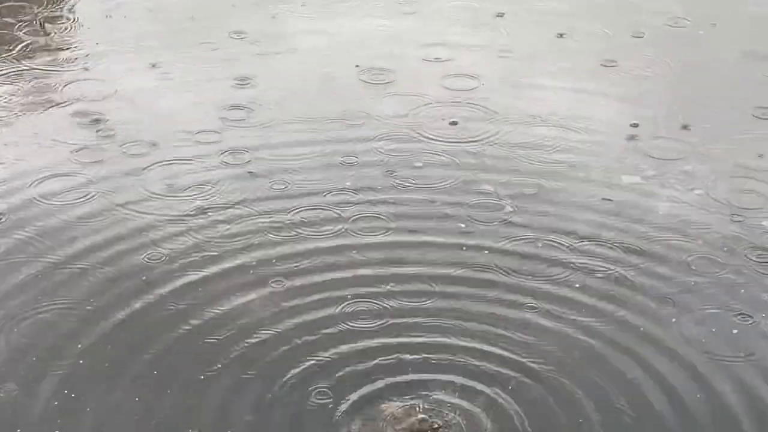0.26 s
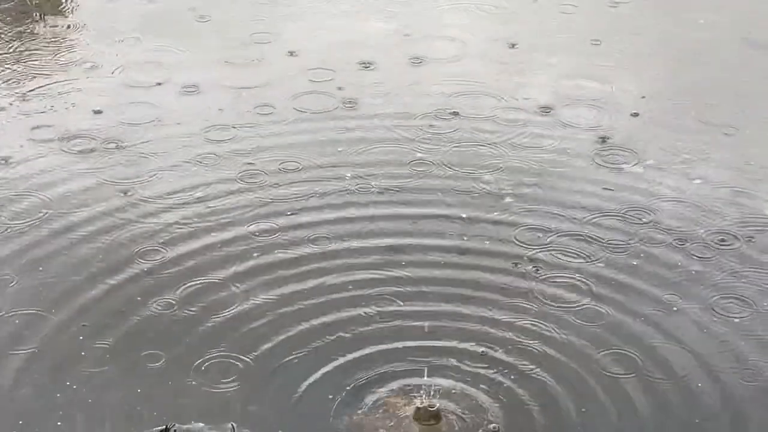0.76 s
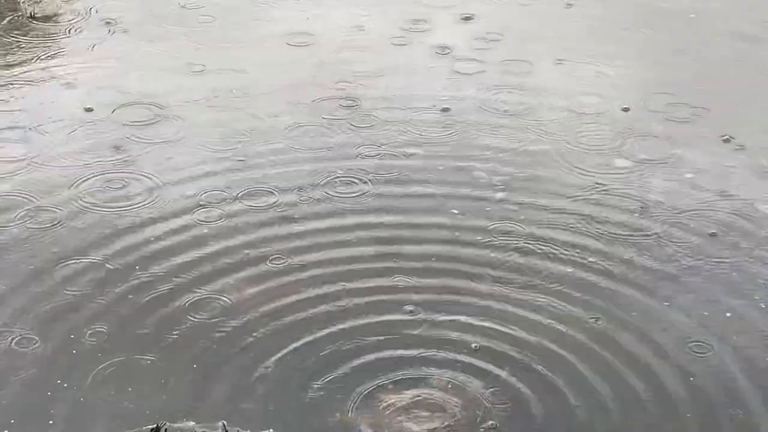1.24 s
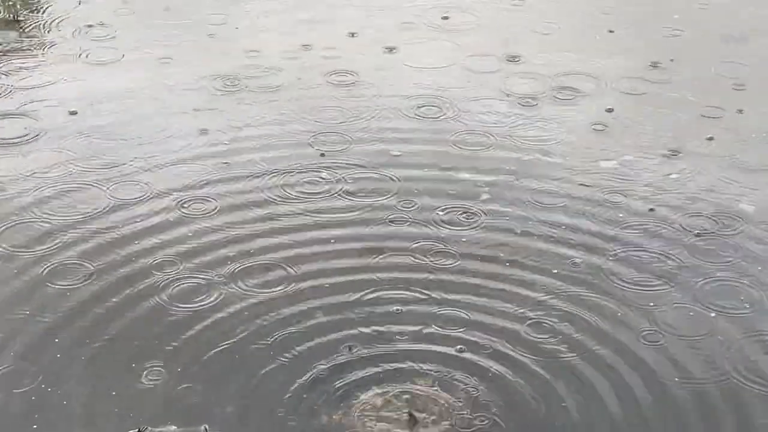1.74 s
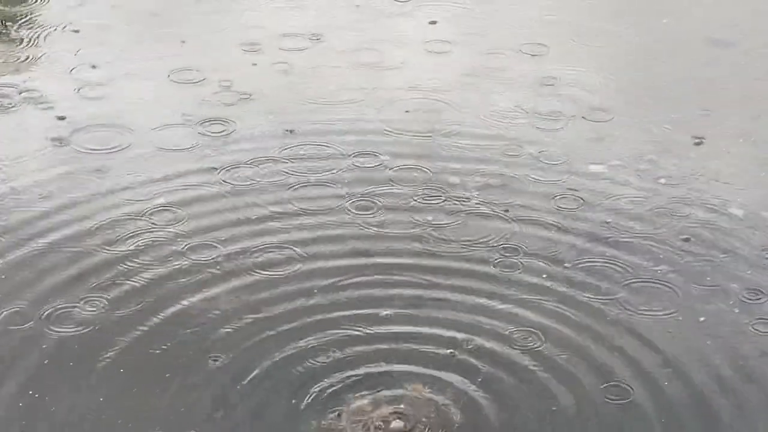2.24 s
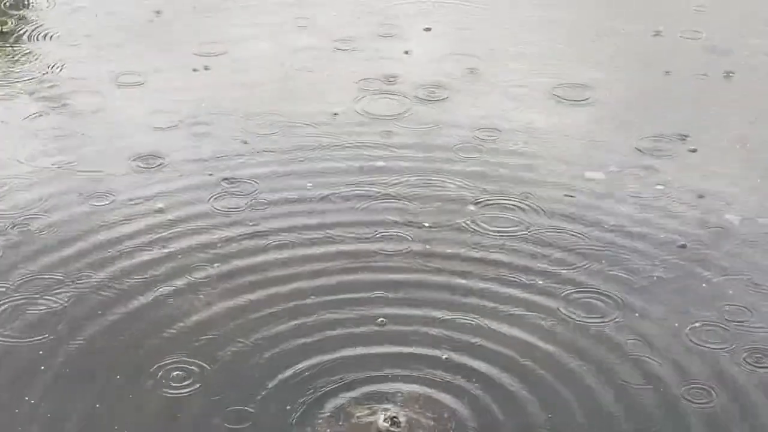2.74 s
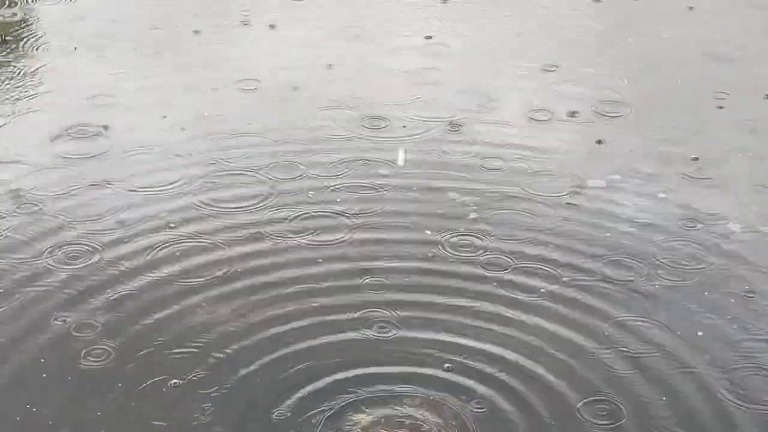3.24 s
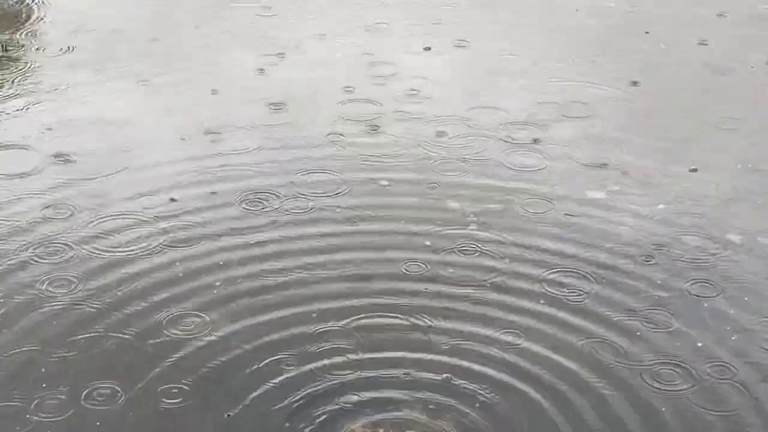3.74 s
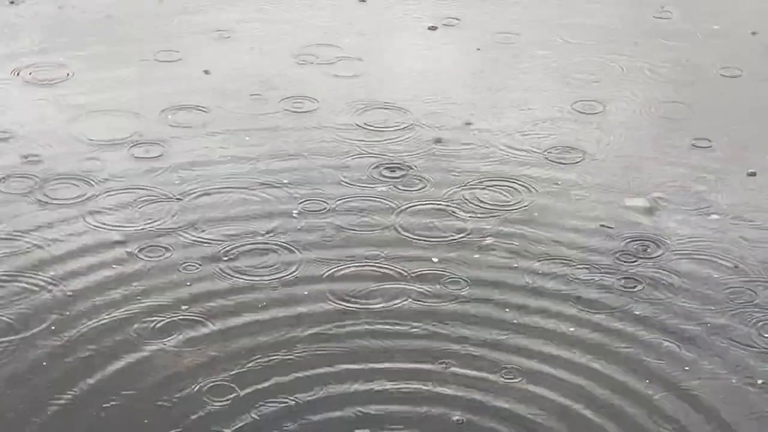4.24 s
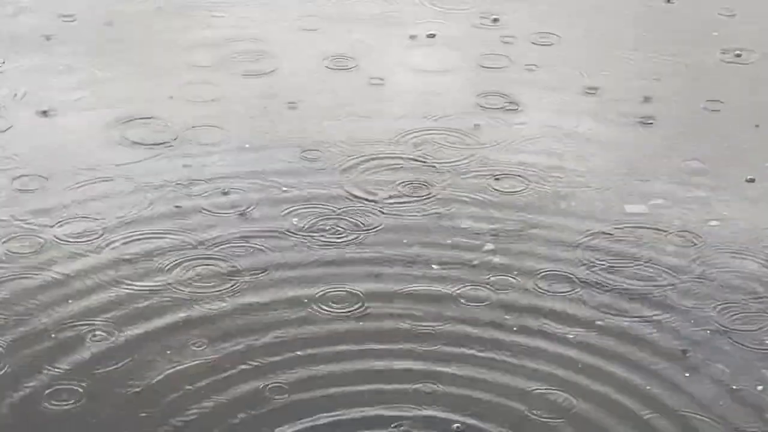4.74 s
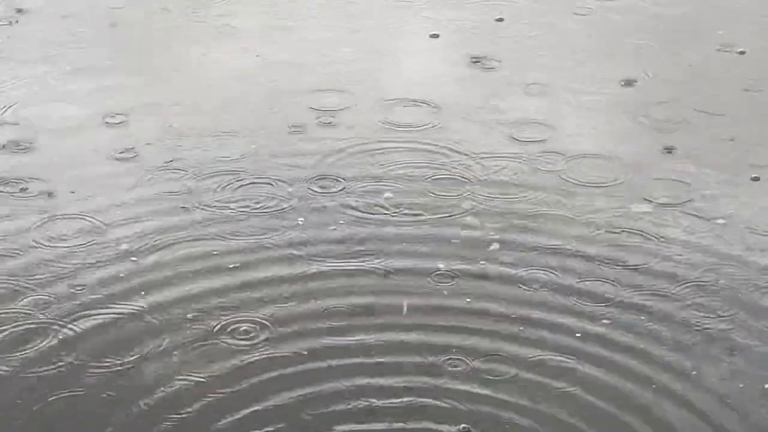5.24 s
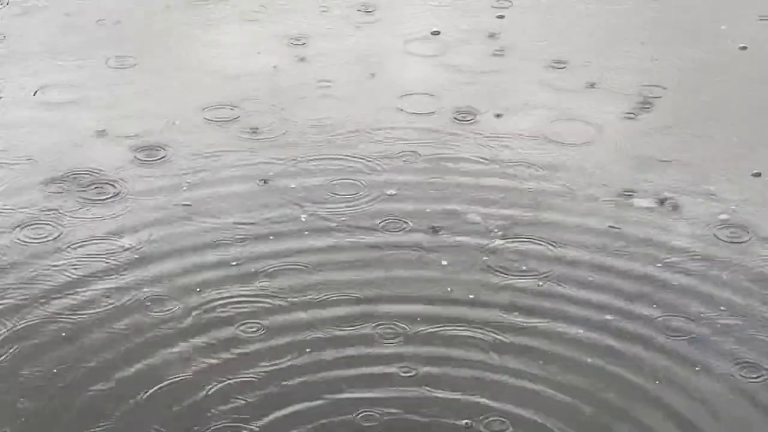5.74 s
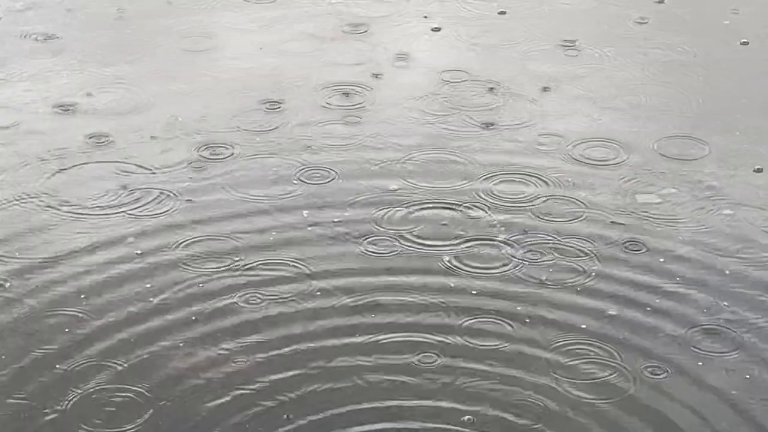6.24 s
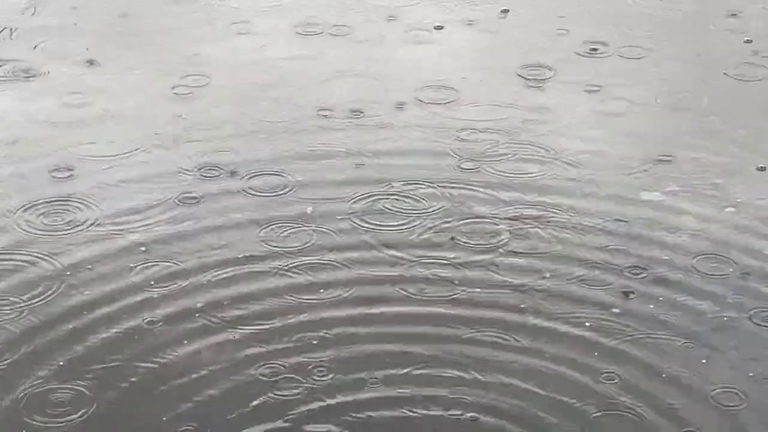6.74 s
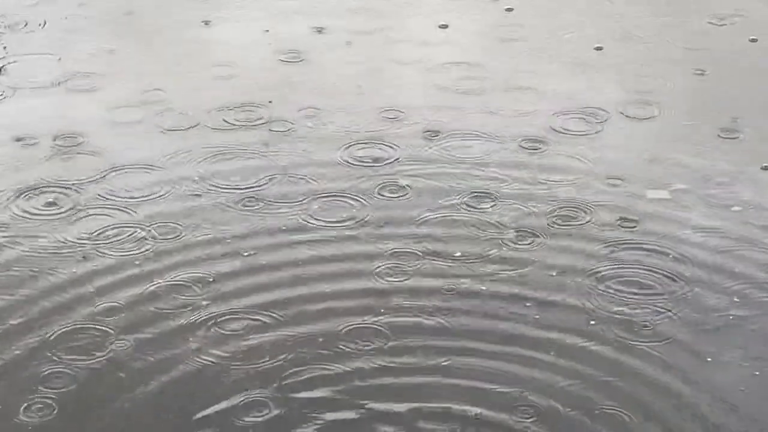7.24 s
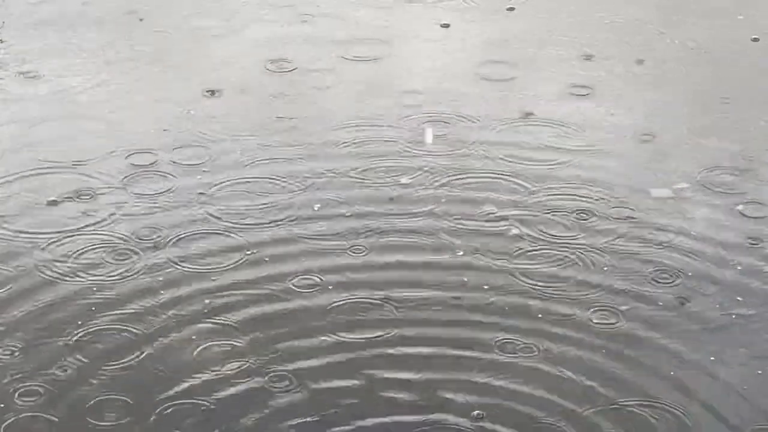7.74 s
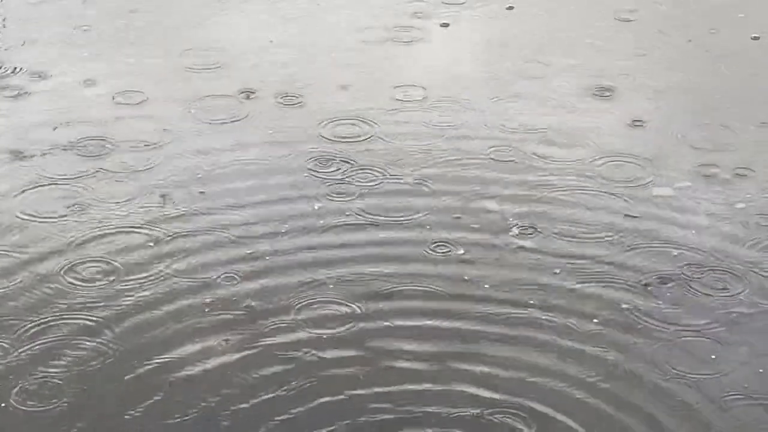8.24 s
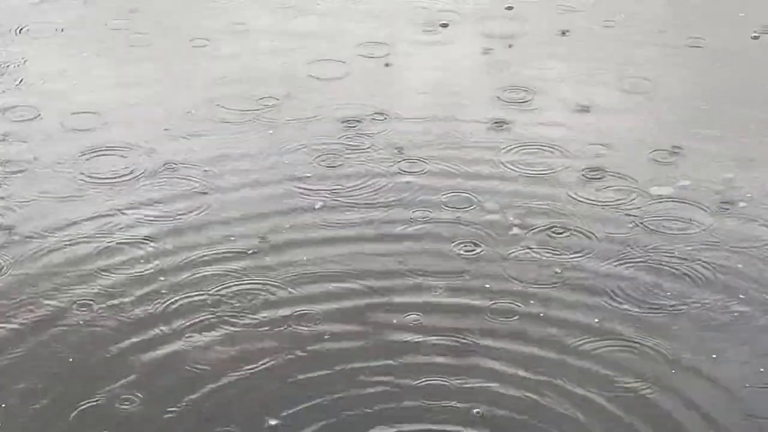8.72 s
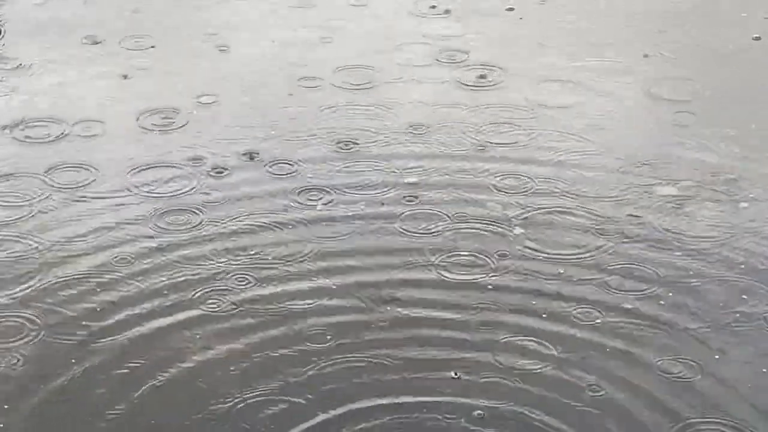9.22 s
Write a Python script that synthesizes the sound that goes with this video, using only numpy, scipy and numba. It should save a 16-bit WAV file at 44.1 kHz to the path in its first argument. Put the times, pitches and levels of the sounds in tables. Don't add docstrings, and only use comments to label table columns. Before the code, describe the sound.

Close-up water drops slap and ring brightly on a puddle, with fine spatter, occasional rounder bubble gulps, gentle rain hiss and distant traffic.

```python
import sys
import numpy as np
from scipy import signal
from scipy.fft import rfft, irfft
from scipy.io import wavfile
from scipy.ndimage import uniform_filter1d
from numba import njit

SR = 44100
rng = np.random.default_rng(int(sys.argv[2]) if len(sys.argv) > 2 else 0)


def natural_amplitude(level_db):
    exponent = np.asarray(level_db, float) / 20
    return 10 ** exponent


def store_wav(level_fs):
    pcm = np.round(np.clip(np.atleast_2d(level_fs), -1, 1) * 32767)
    wavfile.write(sys.argv[1], SR, pcm.T.astype(np.int16))


N = 418068

# t/s, level/dB
TRAFFIC_RUMBLE = [(0.0, -57), (0.02, -49.5), (1.95, -53.5), (2.43, -46), (2.59, -51), (3.85, -52),
                  (4.3, -44.5), (5.04, -55.5), (5.07, -49), (7.82, -49), (8.58, -46.5), (8.84, -58),
                  (9.0, -45.5), (9.48, -53)]
# t/s, f/Hz, level/dB
ENGINE_LINE = [
    (1.9, 90, -55),
    (2.2, 90.2, -54),
    (2.9, 99, -52),
    (3.55, 103, -56),
    (3.9, 89, -51.5),
    (4.4, 78.8, -55),
]
# f/Hz, density/dB per Hz
TOWN_SPECTRUM = [(22, -45), (38, -12.5), (62, 1), (100, -12), (118, -12.5), (138, -9), (200, -16),
                 (400, -22.5), (700, -25.5), (1300, -27), (2000, -26.5), (2800, -40), (4000, -46)]
# f/Hz, likeness of the ports/0-1
TOWN_LIKENESS = [(60, 0.97), (150, 0.88), (300, 0.77), (640, 0), (1400, 0.07), (2400, 0.83)]
# t/s, level/dB
FAR_RAIN_LEVEL = [(0.0, -52), (1.16, -59), (1.77, -59), (3.48, -60), (4.14, -56), (4.28, -57),
                  (5.91, -59.5), (6.07, -55.5), (7.71, -59.5), (8.9, -57.5), (9.48, -60.5)]
# f/Hz, density/dB per Hz
HISS_SPECTRUM = [(1200, -72), (1900, 11), (2600, 14), (4200, 6), (5800, 1), (8500, 15), (10500, 0.5),
                 (12500, 2), (16000, -38)]
# delay/s, level/dB
WALL_ECHOES = [(.0052, -20), (.0103, -19), (.0152, -14), (.0195, -8), (.030, -19), (.043, -16)]
# f/Hz, level/dB
PORT_BALANCE = [(60, 1.5), (110, 4.5), (200, 2.5), (380, 2), (700, 1.5), (1290, 4.5), (2380, 2), (4400, 2),
                (8120, 0.0), (15000, -0.5)]
# f/Hz, phase/rad
PORT_LEAD = [(0, 0), (2500, .15), (5600, 0), (6800, -1.1), (8200, -3.14), (10100, -5.2), (11400, -6.3),
             (12700, -7.1), (14000, -9.1), (15200, -9.85), (16500, -10.4), (22050, -12)]
# f/Hz, level/dB
FIZZ_SPECTRUM = [(6000, -24.5), (9000, 5), (12500, -3), (15500, 2)]
# f/Hz, level/dB
CRACK_SPECTRUM = [(2000, -20), (4500, -6.5), (6500, 1), (9500, -8.5)]
# t/s, peak level/dB, f/Hz
STEADY_BUBBLES = [(0.378, -43, 2720), (0.405, -44, 2260), (2.119, -49, 1850), (2.21, -42, 2030),
                  (2.264, -46, 1450), (5.54, -43, 2030), (7.944, -50, 1370), (8.861, -43, 2050),
                  (9.207, -40.5, 876)]
# t/s, peak level/dB, f/Hz, pitch rise/octaves
BIG_BUBBLES = [(0.816, -27, 1277, 0.79), (2.147, -48, 1520, .35), (2.215, -55.5, 907, .2),
               (5.322, -55, 920, 0.33), (5.547, -55, 940, 0.3), (5.753, -48, 1250, 0.57),
               (5.96, -37.5, 823, 1.1), (6.648, -51.5, 1120, 0.73), (7.098, -46.5, 1028, 0.31),
               (7.261, -37.5, 836, 0.76), (7.908, -48.5, 845, 0.25), (8.556, -53, 990, 0.44),
               (8.866, -55, 945, .2)]
# t/s, peak fizz level/dB
FINE_SLAPS = [(2.3675, -43), (4.33, -41), (6.259, -43), (6.54, -45), (6.631, -39), (8.511, -41),
              (8.652, -43), (9.1484, -39.5), (9.238, -37)]
# t/s, peak fizz level/dB, crack re fizz/dB
STONE_SLAPS = [(0.094, -34.5, -12), (0.1133, -35, -12), (0.2615, -26.5, -22), (1.296, -48, -15),
               (1.4012, -31.5, -15.5), (1.467, -35.5, -10), (1.9202, -31, -22), (2.044, -27, -32),
               (2.0447, -21, -25), (2.2967, -40, -12), (2.6889, -34, -12.5), (2.877, -35, -20),
               (3.2871, -32, -16), (3.766, -38, -8), (3.9852, -24, -9.5), (4.221, -38, -9),
               (4.6266, -34, -10.5), (4.783, -29, -28), (5.2641, -24.5, -21), (5.283, -33, -21),
               (5.912, -30.5, -13), (6.4527, -43, -14), (6.768, -30, -17), (7.012, -40, -10.5),
               (7.0447, -35.5, -21), (7.7998, -31, -22), (7.8543, -33.5, -10.5), (8.333, -41.5, -7),
               (8.701, -30, -19), (9.2804, -33.5, -20)]
# t/s, peak crack level/dB
WATER_SLAPS = [(0.5379, -42), (0.7473, -33), (1.0303, -44), (1.3857, -54), (2.245, -46), (2.4515, -48.5),
               (2.5023, -49), (2.826, -47), (3.014, -45), (3.5009, -48), (3.6916, -41.5), (4.0282, -44.5),
               (4.139, -45), (4.182, -35), (4.517, -48), (4.986, -51), (5.6307, -48), (5.9303, -59),
               (6.3028, -39), (6.563, -48), (7.0845, -48), (7.206, -37.5), (7.322, -41.5), (7.676, -48),
               (7.8092, -49), (8.2808, -44), (8.4775, -43), (8.7869, -46), (8.83, -42), (9.2289, -50)]
# t/s, peak level/dB, f/Hz
HEAVY_SPLASHES = [(0.5357, -33.5, 2490), (2.4508, -33, 2550), (2.723, -34, 2350), (3.014, -27, 2734),
                  (3.7898, -33.5, 2260), (6.3026, -28.5, 2080), (6.6375, -40, 2514), (7.7987, -33.5, 1950)]
# t/s, peak level/dB, bubble f/Hz, ring/cycles, spatter and echo level/dB
ROOF_DRIPS = [(0.0939, -31, 3140, 8, -7), (0.416, -27.5, 4670, 2.7, -9.5), (0.5397, -28, 3220, 3.3, -4.5),
              (0.7471, -26.5, 3680, 3.3, -2), (1.0743, -30.5, 6050, 5.5, 1), (2.044, -25, 6800, 1.6, -28),
              (2.452, -26, 3900, 1.7, -13), (2.7232, -25.5, 3450, 1.6, -14.5),
              (3.014, -24.5, 4900, 2.3, -6.5), (3.7912, -31.5, 4700, 3.7, 0),
              (3.9852, -26.5, 2940, 15, -7.5), (4.183, -23.5, 3370, 2.9, -0.5),
              (4.6263, -20.5, 6050, 1.5, -24), (5.2642, -30, 3670, 5.1, -8.5),
              (5.4795, -29, 4440, 3.7, -3.5), (6.11, -28, 5060, 4.7, -7), (6.3034, -24, 2330, 1.6, -8),
              (6.6365, -31, 3060, 3.3, -1), (7.206, -29, 3030, 13, -5.5), (7.7997, -29.5, 3760, 1.6, -4.5),
              (7.854, -34, 4040, 6, -3.5), (8.8323, -26.5, 6000, 2.6, -11), (8.8469, -26, 5500, 3, -12.5),
              (8.906, -29, 4640, 1, -7.5)]
# t/s, peak level/dB, bubble f/Hz
EVEN_DROPS = [(0.0564, -34, 4550), (0.3416, -32, 4170), (1.0316, -40, 3830), (1.0467, -37, 6160),
              (1.1693, -31.5, 4800), (1.2176, -30, 4600), (1.6077, -37.5, 6400), (1.7777, -38.5, 5400),
              (3.6381, -35, 6830), (4.0043, -37, 3100), (4.5296, -30, 3180), (4.8976, -39.5, 4640),
              (4.9868, -36, 4350), (5.3428, -40, 4200), (5.416, -38.5, 5300), (5.6304, -38.5, 4210),
              (5.7749, -43, 3420), (5.9404, -32.5, 5600), (6.0251, -30.5, 5500), (6.1451, -31.5, 4210),
              (6.7635, -31.5, 4690), (7.0858, -33.5, 6290), (7.2794, -35, 3630), (7.3228, -36, 3546),
              (7.3748, -36.5, 5740), (7.676, -35.5, 5970), (8.2805, -30, 4540), (8.477, -33.5, 3350),
              (8.7635, -37, 3260), (9.4709, -30.5, 7230)]
# t/s, peak level/dB, bubble f/Hz
SHATTERED_DROPS = [(0.4824, -37.5, 5470), (0.8584, -46, 3170), (0.9622, -35.5, 3840), (1.1548, -39, 4700),
                   (1.401, -38, 6200), (1.432, -40.5, 3800), (1.484, -39.5, 4170), (2.1261, -44, 3100),
                   (2.2375, -34, 4630), (2.6905, -53, 2180), (3.2873, -43.5, 5140), (3.3428, -43, 4170),
                   (3.3897, -34, 4130), (3.5014, -37.5, 4330), (4.1381, -36, 3080), (4.15, -36, 5200),
                   (4.4298, -45.5, 2900), (4.6931, -35, 3520), (5.9632, -39.5, 3520), (6.54, -43, 3330),
                   (6.5637, -39, 3750), (7.1911, -42, 4100), (8.1718, -41, 5440), (8.2022, -46, 5730),
                   (9.0074, -43, 4140), (9.23, -42, 5504)]
# t/s, peak level/dB, bubble f/Hz
CLEAN_DROPS = [(0.1118, -37, 3260), (0.2255, -32.5, 6600), (0.672, -36, 5070), (0.8395, -35.5, 2760),
               (0.874, -33.5, 5500), (1.4426, -32.5, 5220), (1.715, -38.5, 5160), (1.8422, -43.5, 3930),
               (2.391, -35.5, 5840), (2.5031, -35, 6250), (2.827, -45, 4890), (2.8764, -29, 4360),
               (2.9692, -36, 5830), (3.2126, -48, 5980), (3.6913, -32, 4200), (3.7656, -32.5, 4380),
               (3.926, -33.5, 5800), (4.7825, -31.5, 4900), (5.285, -34.5, 3700), (5.911, -35, 5880),
               (6.6019, -31.5, 4440), (7.2266, -33, 3380), (8.3898, -35, 5800), (8.5106, -37, 3470),
               (8.594, -37, 5405), (8.6524, -39, 4700), (8.6772, -38, 5660), (9.0753, -38, 4940),
               (9.2831, -39, 5690)]

# ring/cycles, spatter and echo level/dB
EVEN_KIND, SHATTERED_KIND, CLEAN_KIND = (3, -2.8), (2, 2.2), (2.93, -8)
YARD_T60_S, BRIGHT_T60_S = 0.41, 0.29
YARD_TAIL_DB, GULP_TAIL_DB = -8.5, -15.5
DROP_DELAY_S = .001
ECHO_SPREAD = .07
PATH_SCATTER = .035


def shape(x, points):
    hz, db = np.transpose(points)
    log_f = np.log(np.fft.rfftfreq(x.shape[-1], 1 / SR) + 1)
    gain = natural_amplitude(np.interp(log_f, np.log(hz), db))
    return irfft(rfft(x) * gain, x.shape[-1])


def curve(table):
    s, *columns = np.transpose(table)
    return [np.interp(np.arange(N) / SR, s, column) for column in columns]


def unit(x):
    return x / np.sqrt(np.mean(x ** 2))


def walk(rate_hz):
    hold = int(SR / rate_hz)
    steps = np.repeat(rng.standard_normal(N // hold + 1), hold)
    return uniform_filter1d(uniform_filter1d(steps, hold), hold)[:N]


@njit
def grains(s, size, hz, cycles, rise_oct):
    out = np.zeros(N)
    for k in range(len(s)):
        span = cycles[k] * SR / hz[k]
        phase, f, a = 0., hz[k] / SR, size[k]
        fade = 10 ** (-1 / span)
        climb, slowing = 2 * np.log(2.) * rise_oct[k] / span, np.exp(-2 / span)
        start = max(int(s[k] * SR), 0)
        for i in range(start, min(N, start + int(2.5 * span))):
            out[i] += a * min(phase / np.pi, 1.) * np.sin(phase)
            phase += 2 * np.pi * min(f, .45)
            f, a, climb = f * (1 + climb), a * fade, climb * slowing
    return out


def ticks(s, fizz, crack):
    pushes = np.zeros((2, N))
    at = np.clip((s * SR).astype(int), 0, N - 1)
    np.add.at(pushes, (slice(None), at), np.array([fizz, crack]))
    return shape(pushes[0], FIZZ_SPECTRUM) + shape(pushes[1], CRACK_SPECTRUM)


def spatter(s, db, hz, count, spread_s, spread_oct=1.71):
    late, small, pitch, ring = np.moveaxis(rng.random((len(s), count, 4)), 2, 0)
    delay_s = .001 - spread_s * np.log(1 - late)
    size = natural_amplitude(db[:, None] + 2.4 * np.log(small + .04) - 210 * delay_s)
    ring_hz = np.minimum(hz[:, None] * 2 ** (spread_oct * (pitch ** 2 - .17)), 15000)
    cycles = 1.2 + 5 * ring.ravel() ** 2
    return grains((s[:, None] + delay_s).ravel(), size.ravel(), ring_hz.ravel(), cycles, cycles / 30)


def town():
    hz, alike = np.transpose(TOWN_LIKENESS)
    alike = np.clip(alike, 0, .995)
    shared, apart = shape(rng.standard_normal((2, N)), TOWN_SPECTRUM)
    mid = shape(shared, np.transpose([hz, 10 * np.log10(1 + alike)]))
    side = shape(apart, np.transpose([hz, 10 * np.log10(1 - alike)]))
    wash = np.array([mid + side, mid - side]) / np.std(mid)
    bass = shape(wash, [(20, -14.0), (130, -1.5), (260, -90)])
    rumble_db, = curve(TRAFFIC_RUMBLE)
    rumble = natural_amplitude(rumble_db + 1.63) * bass
    steady_wash = natural_amplitude(-51.5 + 1.0 * walk(2.13)) * (wash - bass)
    engine_hz, engine_db = curve(ENGINE_LINE)
    engine = natural_amplitude(engine_db + 3.4 * walk(4.0)) * np.sin(2 * np.pi * np.cumsum(engine_hz) / SR)
    return rumble + steady_wash + engine


def far_rain(count=3500):
    when, size, pitch, ring, slap = rng.random((count, 5)).T
    s = when * N / SR
    size = natural_amplitude(np.minimum(-4.0 * np.log(1 - size), 18))
    rings = grains(s, size, 2300 * 2 ** (1.9 * pitch), 1.2 + 11 * ring, 0.3 * ring)
    large = slice(0, count // 10)
    splash_hz = 3600 * 2 ** (1.8 * ring[large])
    splashes = spatter(s[large], 14 * slap[large], splash_hz, count=16, spread_s=.018)
    patter = shape(unit(rings) + 3.27 * unit(splashes), [(900, -51), (2000, -2.5)])
    patter = patter + 1.51 * unit(ticks(s, size * slap, size * ring))
    swell = walk(10)
    hiss = np.zeros(N)
    for hz in 1300 * 1.3 ** np.arange(11):
        band = shape(rng.standard_normal(N), [(hz / 1.5, -25), (hz, 0), (hz * 1.5, -25)])
        hiss += natural_amplitude(2.5 * swell + 3 * walk(22)) * band
    level, = natural_amplitude(curve(FAR_RAIN_LEVEL))
    return level * natural_amplitude(-9.5) * patter, level * natural_amplitude(-2.5) * unit(shape(hiss, HISS_SPECTRUM))


def yard(x, tail_db):
    t = np.arange(SR // 2) / SR
    onset = np.minimum(t / .014, 1) ** 2
    tail = rng.standard_normal(len(t)) * natural_amplitude(-60 * t / YARD_T60_S) * onset
    dull = uniform_filter1d(tail, size=4)
    bright = natural_amplitude(-60 * t / BRIGHT_T60_S)
    response = natural_amplitude(tail_db) * unit(bright * tail + (1 - bright) * 2 * dull) / np.sqrt(len(t))
    for s, db in WALL_ECHOES:
        late = (s * SR * (1 + ECHO_SPREAD * (rng.random(4) - .5))).astype(int)
        np.add.at(response, late, natural_amplitude(db - 7))
    return signal.fftconvolve(x, response)[:N]


def ports(x, steer, path=1):
    hz, lead = np.transpose(PORT_LEAD)
    lead = np.interp(path * np.fft.rfftfreq(N, 1 / SR), hz, lead)
    turn = np.exp(.5j * (lead - steer * np.sin(2 * lead) / 2))
    return irfft(rfft(x) * np.array([turn, 1 / turn]), N)


def blips():
    s, db, hz = np.transpose(STEADY_BUBBLES)
    cycles, rise_oct = np.full(len(s), 18.), np.full(len(s), .04)
    return grains(s, natural_amplitude(db), hz, cycles, rise_oct)


def gulps():
    s, db, hz, rise_oct = np.transpose(BIG_BUBBLES)
    rise_oct = np.clip(rise_oct, .1, 1.5)
    start_hz = hz * 2 ** (-.55 * rise_oct)
    cycles = 8.6 * (900 / hz) ** 1.4 / np.sqrt(rise_oct + .4)
    bubbles = grains(s, natural_amplitude(db), start_hz, cycles, rise_oct)
    near = shape(natural_amplitude(7.5) * bubbles, [(250, 3.6), (520, 0.42)])
    sent = shape(natural_amplitude(4) * bubbles, [(500, 1.5), (1000, 4.5)])
    return near, sent


def near_slaps():
    stone = [(s, db, db + crack_db) for s, db, crack_db in STONE_SLAPS]
    fine = [(s, db, db - 10.5) for s, db in FINE_SLAPS]
    water = [(s, db - 15.5, db) for s, db in WATER_SLAPS]
    return np.transpose(stone + fine + water)


def near_drops():
    rows = list(ROOF_DRIPS)
    rows += [(*row, *EVEN_KIND) for row in EVEN_DROPS]
    rows += [(*row, *SHATTERED_KIND) for row in SHATTERED_DROPS]
    rows += [(*row, *CLEAN_KIND) for row in CLEAN_DROPS]
    return np.transpose(rows)


def drops():
    s, db, hz, cycles, after_db = near_drops()
    s, cycles = s + DROP_DELAY_S, np.clip(cycles, 1.5, 10)
    rise_oct = np.full(len(s), .25)
    droplets = spatter(s, db + after_db - 0.5, hz, count=34, spread_s=.035)
    heavy_s, heavy_db, heavy_hz = np.transpose(HEAVY_SPLASHES)
    droplets = droplets + spatter(heavy_s, heavy_db - 3.5, heavy_hz, count=55, spread_s=.045, spread_oct=0.76)
    tick_s, fizz_db, crack_db = near_slaps()
    tick_s, fizz, crack = tick_s + DROP_DELAY_S, natural_amplitude(fizz_db + 10.5), natural_amplitude(crack_db + 31.5)
    here = ticks(tick_s[::2], fizz[::2], crack[::2])
    across = ticks(tick_s[1::2], fizz[1::2], crack[1::2])
    small_bubbles = [(600, -3), (1400, 6.5)]
    rings = grains(s, natural_amplitude(db + 2.5), hz, cycles, rise_oct)
    sent_rings = grains(s, natural_amplitude(db + after_db + 1.5), hz, cycles, rise_oct)
    near = shape(rings + droplets, small_bubbles)
    sent = shape(sent_rings + 0.54 * droplets, small_bubbles)
    return near + here, across, sent + 1.07 * (here + across)


def scene():
    patter, hiss = far_rain()
    blip = blips()
    gulp, gulp_send = gulps()
    drop, across, drop_send = drops()
    wet = yard(drop_send + patter, YARD_TAIL_DB) + yard(gulp_send + blip, GULP_TAIL_DB)
    near = ports(drop + gulp + blip, steer=-.4, path=1 - PATH_SCATTER)
    near = near + ports(across, steer=-.4, path=1 + PATH_SCATTER)
    return town() + ports(patter + hiss + wet, steer=.85) + near


def low_pass(x):
    return signal.sosfilt(signal.butter(12, 17330, fs=SR, output="sos"), x)


def record(dry):
    hz, db = np.transpose(PORT_BALANCE)
    left = shape(dry[0], np.transpose([hz, db / 2]))
    right = shape(dry[1], np.transpose([hz, -db / 2]))
    top_end = [(13500, 0), (15500, 3), (15950, 2), (16100, -5), (16600, -17), (16950, -55)]
    return low_pass(shape(np.array([left, right]), top_end))


dry = scene()
out = record(dry)
store_wav(out)
```